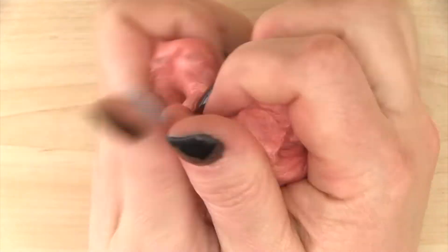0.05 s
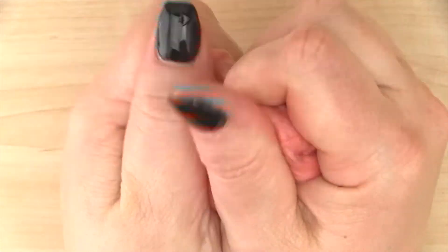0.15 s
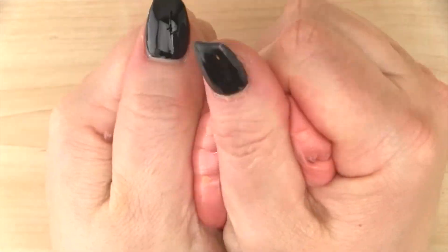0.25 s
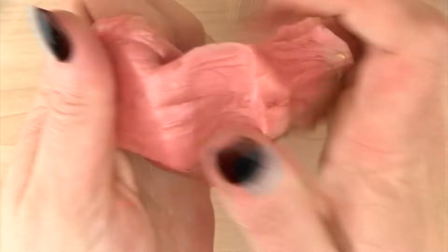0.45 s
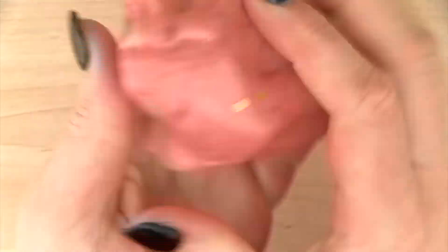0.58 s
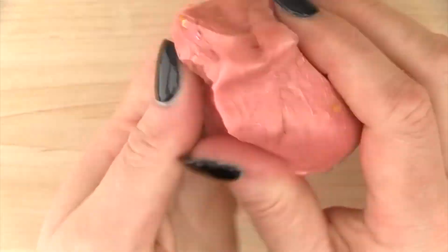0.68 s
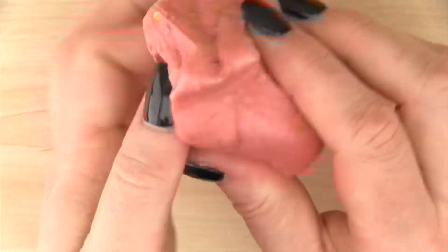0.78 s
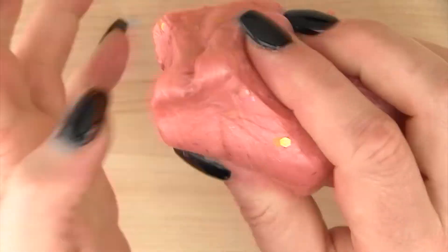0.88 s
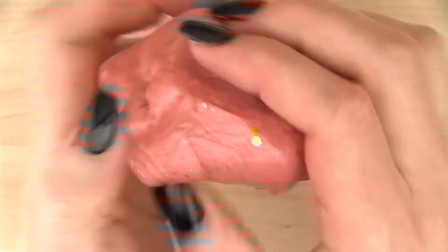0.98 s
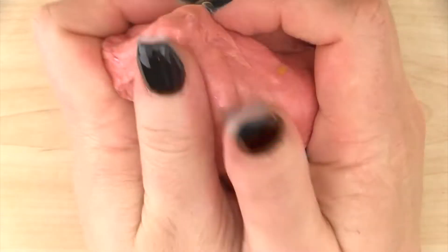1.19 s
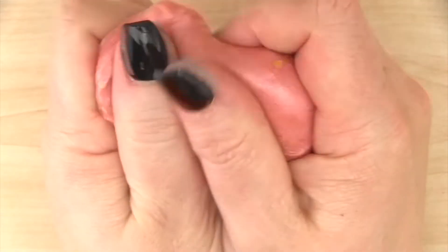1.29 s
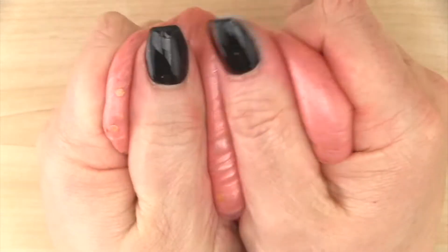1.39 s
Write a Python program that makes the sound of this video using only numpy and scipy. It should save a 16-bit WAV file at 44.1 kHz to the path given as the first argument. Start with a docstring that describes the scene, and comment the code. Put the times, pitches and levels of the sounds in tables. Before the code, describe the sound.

Close-up slime kneading in a small, still room; air pockets snap loudly in rapid succession early on, then only quiet scattered pops, sticky peeling and light ticks remain, over barely audible hiss and low hum.

```python
"""A table in a quiet room: slime is squeezed and folded between fingers, close to the microphone.
Trapped air pockets burst: a filtered impulse is the skin's snap, a decaying sine the cavity's ring.
Larger pockets also thud. Sticky folds peel apart in swells of random ticks, bubbles and squishes.
Hands, table and room answer by convolution; faint hiss and hum lie beneath."""
import sys
import numpy as np
from scipy import signal
from scipy.fft import rfft, irfft
from scipy.io import wavfile

SR = 44100
rng = np.random.default_rng(int(sys.argv[2]) if len(sys.argv) > 2 else 0)


def bounce(signal):
    """Save signal as a 16-bit WAV file at the path given by the first command-line argument."""
    frames = np.transpose(np.atleast_2d(signal))
    limited = np.clip(frames, -1, 1)
    pcm = np.round(limited * 32767).astype(np.int16)
    wavfile.write(sys.argv[1], SR, pcm)


N = 63945
EDGE_HZ = 16100  # upper band limit


def amp(db):
    """Decibels to gain."""
    return 10 ** (np.asarray(db) / 20)


def evened(x):
    """Scales to rms 1."""
    return x / np.sqrt(np.mean(x ** 2) + 1e-20)


def read(points, hz):
    """Interpolates a table along a log-frequency axis."""
    f_hz, value = np.transpose(points)
    return np.interp(np.log(hz + 1), np.log(f_hz), value)


def add(mix, start_s, sound):
    """Mixes a sound in at a time, cut at the end of the mix."""
    part = mix[max(round(start_s * SR), 0):][:len(sound)]
    part += sound[:len(part)]


def slope(x, hz, kind):
    """First-order low- or high-pass."""
    return signal.lfilter(*signal.butter(1, hz, kind, fs=SR), x)


def coloured(x, points, size=4096):
    """Minimum-phase filter with the given spectrum."""
    hz = abs(np.fft.fftfreq(size, 1 / SR))
    log_gain = np.log(amp(read(points, hz)))
    min_phase = np.exp(np.conj(signal.hilbert(log_gain)))
    taps = np.fft.ifft(min_phase).real[:size // 2]
    return signal.fftconvolve(x, taps)[:len(x)]


def pops():
    """Each skin breaks with a snap; the cavity under it rings briefly, its pitch rising."""
    # Bursting air pockets: t/s, ring level/dB, cavity f/Hz, ring decay/ms, snap level/dB, snap low-pass f/Hz
    pop_table = [ (0.0368, -53, 3600, .4, -26, 9100), (0.0425, -47.5, 1615, 5.8, -34, 10000),
                 (0.0691, -45.5, 4800, 0.16, -30.5, 14100), (.0055, -52, 10600, 1.7, -42.5, 9200),
                 (.1155, -68, 3500, 0.23, -41.5, 12000), (.1310, -46.5, 605, 1.1, -31.5, 3990),
                 (.1474, -40, 5500, 0.14, -25, 7500), (0.1948, -49, 9900, 0.65, -40, 8970),
                 (0.1992, -49.5, 4454, 0.095, -27.5, 10050), (0.2186, 1.5, 2490, 0.37, -27, 12000),
                 (0.2188, -12, 6000, 0.5, -37, 9000), (.2196, 2, 3627, 0.56, -12, 8000),
                 (0.2506, -13, 3340, 1, -1, 8500), (0.2526, -20, 2560, 1.8, 2.5, 5000),
                 (0.2633, -43, 4000, 0.092, -6.5, 10000), (.2700, -26.5, 2974, 0.75, -0.5, 14000),
                 (0.3041, -23, 2650, 0.86, -10, 5000), (0.315, -18, 3620, .3, -15, 13900),
                 (.3230, 0.5, 12260, .1, -7, 14400), (0.3329, -11, 9150, 0.25, -20, 7000),
                 (.3390, -25.5, 3190, 0.77, -19, 7000), (.3441, -32.5, 12100, 0.2, -22.5, 12000),
                 (0.3579, -39, 7000, .15, -26.5, 12000), (0.471, -44, 6700, 1.1, -40.5, 7000),
                 (0.498, -44.5, 430, 3.6, -35, 5000), (0.5094, -32.5, 3640, 1.6, -21, 4930),
                 (0.5903, -40.5, 4400, .5, -39.5, 8930), (.6670, -53, 1850, 1.4, -30.5, 10080),
                 (0.6772, -49, 3300, 1.0, -38.5, 8000), (0.7212, -40.5, 3440, 1.64, -40.5, 7960),
                 (0.72, -39, 4330, 1.6, -43, 7870), (0.8198, -58.5, 683, 2.8, -35.5, 6050),
                 (.8300, -44.5, 3463, 1.2, -43, 8070), (.8820, -46, 7600, .7, -42, 7000),
                 (.8927, -36.5, 3510, 1.13, -34, 9000), (.8985, -42, 717, 12.8, -53, 8930),
                 (.9000, -30.5, 3400, 0.78, -17.5, 3970), (0.9054, -35, 3300, 1.3, -39, 5025),
                 (1.1030, -63, 1561, 2.57, -44, 4920), (1.1160, -52, 1668, 3.67, -42, 4986),
                 (1.186, -56, 3735, 1.15, -47.5, 7960), (1.2502, -30.5, 1530, 0.25, -25, 6500),
                 (1.269, -55, 3930, .8, -48, 6060), (1.2829, -54.5, 4680, 0.47, -44, 8940),
                 (1.327, -58, 893, 1.2, -32.5, 4980), (1.3838, -24, 9000, 0.051, -13.5, 14030),
                 (1.4010, -33.5, 3440, .9, -26.5, 13000), (1.4070, -45, 2960, .8, -26.5, 6980),
                 (1.4331, -42, 1000, 1.9, -22, 4000), (1.438, -60, 3400, 0.18, -34, 11000)]
    attack_share = 0.12  # of the ring's decay
    rise_share = 0.03  # total pitch rise, centred on the cavity pitch
    # Small sources radiate little bass.
    ring_low_share, snap_low_hz = 0.62, 650
    out = np.zeros(N)
    ms = np.arange(SR // 10) / SR * 1000
    for start_s, ring_db, hz, decay_ms, snap_db, bright_hz in pop_table:
        left = np.exp(-ms / decay_ms)
        opening = 1 - np.exp(-ms / (attack_share * decay_ms))
        turns = np.cumsum(hz * (1 + rise_share * (.5 - left))) / SR
        radiation = signal.butter(2, ring_low_share * hz, "high", fs=SR)
        ring = signal.lfilter(*radiation, opening * left * np.sin(2 * np.pi * turns))
        brightness = signal.butter(2, min(bright_hz, EDGE_HZ), fs=SR)
        snap = signal.lfilter(*brightness, signal.unit_impulse(len(ms)))
        snap = slope(snap, snap_low_hz, "high")
        add(out, start_s, amp(ring_db) * ring + amp(snap_db) * snap)
    return out


def thuds():
    """The mass closes on a larger pocket: a low sine that swells and dies away softly."""
    # Thuds: t/s, level/dB, f/Hz, decay/ms (also the time of the envelope's peak)
    thud_table = [(0.2191, -24, 370, 0.52), (.2505, -32.5, 480, 0.68), (.2634, -39, 420, .7),
                  (.2700, -31, 450, 0.77), (0.3047, -35.5, 460, 0.47), (0.5109, -49, 430, 1.0)]
    out, t = np.zeros(N), np.arange(SR // 10) / SR
    for start_s, db, hz, decay_ms in thud_table:
        age = t * 1000 / decay_ms
        swell = age * np.exp(1 - age)
        add(out, start_s, amp(db) * swell * np.sin(2 * np.pi * hz * t))
    return out


def squelches():
    """Sticky folds part in a swell of crackles; the gap between them resonates as a squish."""
    # Peeling folds: t of peak/s, rise/s, fall/s, crackle level/dB, squish level/dB, squish f/Hz
    fold_table = [ (.006, 0.0062, .012, -64.5, -67, 1100), (.044, 0.01, 0.0067, -50.5, -59.5, 1370),
                  (0.094, 0.033, 0.12, -68, -73, 700), (0.2543, 0.0026, 0.0097, -34.5, -35.5, 1120),
                  (0.2705, 0.0014, 0.0027, -23, -30, 1200), (.307, 0.0014, 0.011, -38, -47.5, 1020),
                  (.466, 0.0061, .014, -70.5, -58, 4700), (0.505, 0.0089, 0.012, -43.5, -53, 450),
                  (0.507, 0.014, .012, -68, -65, 150), (.528, .01, 0.009, -58.5, -56.5, 1650),
                  (.552, 0.0081, 0.011, -53.5, -61.5, 500), (0.588, 0.0025, 0.0077, -54.5, -58, 4670),
                  (0.613, 0.012, 0.023, -62, -64.5, 3260), (0.676, 0.006, 0.02, -60, -70.5, 3000),
                  (.723, .006, .008, -70, -60.5, 4200), (.822, .008, 0.015, -72, -64.5, 676),
                  (0.847, 0.03, .012, -71, -60.5, 2960), (0.899, 0.004, 0.0073, -46.5, -44.5, 1005),
                  (0.89, 0.01, 0.0054, -64, -54.5, 3000), (0.955, 0.0095, .012, -68.5, -81, 1592),
                  (1.083, 0.0087, .03, -72, -76, 1700), (1.134, .003, 0.0032, -74, -72.5, 4800),
                  (1.205, 0.025, 0.01, -70, -83, 3680), (1.253, 0.00091, 0.0052, -70, -50, 1900),
                  (1.297, .008, .010, -67, -67, 4900), (1.366, 0.012, 0.0059, -72, -71, 4000),
                  (1.414, .006, 0.0095, -61.5, -62, 7800), (1.434, .002, 0.0046, -72, -53.5, 1550)]
    squish_q = 2.7
    t, crackles = np.arange(N) / SR, crackle()
    out, power = np.zeros(N), np.zeros(N)
    for peak_s, rise_s, fall_s, crackle_db, squish_db, hz in fold_table:
        swell = np.exp(-np.maximum((peak_s - t) / rise_s, (t - peak_s) / fall_s))
        squish = signal.lfilter(*signal.iirpeak(hz, squish_q, fs=SR), grains())
        squish = slope(squish, hz * 2, "low")
        squish = slope(squish, hz / 2, "high")
        out += amp(squish_db) * swell * evened(squish)
        power += (amp(crackle_db) * swell) ** 2
    return out + np.sqrt(power) * crackles


def crackle(count=24):
    """Dry ticks mixed with tiny resonant bubbles, each at one of a set of pitches."""
    # Crackle colour: f/Hz, relative level/dB
    crackle_colour = [(60, -22.5), (150, -11.5), (300, -9), (600, -7), (1500, -2), (2600, -1), (3500, 4.5),
                      (4600, -3), (7000, -6), (11000, -11.5), (16000, -15.5)]
    low_hz, high_hz, bubble_q = 1200, 13000, 11
    bubble_db = 0  # against the dry ticks
    train, which = grains(), rng.integers(0, count, N)
    bubbles = np.zeros(N)
    for k, hz in enumerate(np.geomspace(low_hz, high_hz, count)):
        bubbles += signal.lfilter(*signal.iirpeak(hz, bubble_q, fs=SR), train * (which == k))
    mixed = evened(grains()) + amp(bubble_db) * evened(bubbles)
    return evened(coloured(mixed, crackle_colour))


def grains():
    """A dense random train of tiny ruptures of uneven size and either sign."""
    mean_rate_hz, spread_db = 2600, 4.5
    size = amp(spread_db * np.minimum(rng.exponential(1, N), 3))
    sign = rng.choice([-1, 1], N)
    return size * sign * (rng.random(N) < mean_rate_hz / SR)


def surroundings(x):
    """Quick echoes off hands and table, a few ringing resonances, and the short tail of a small room."""
    # Echoes between hands and table: delay/s, strength (gain)
    echoes = [(.00058, 0.17), (.0016, .08)]
    # Room answer: f/Hz, level/dB
    room_colour = [(100, -4), (400, -1), (1000, -1), (2400, -2.4), (3500, 4.4), (5000, -0.3), (9000, -3),
                   (16000, -1.6)]
    # Room decay: f/Hz, t60/s
    room_t60 = [(100, 0.21), (1000, .33), (3500, 0.21), (8000, 0.2), (16000, 0.16)]
    # Resonances: f/Hz, t60/s, level/dB
    resonances = [(2379, 0.045, -31.5), (3030, 0.06, -30.5), (3400, .04, -28), (3675, 0.036, -25.5)]
    scatter_db, scatter_t60_s = -9, .024
    room_db, room_delay_s = -14.5, 0.0021
    t = np.arange(SR // 2) / SR
    near, far = rng.choice([-1., 1.], (2, len(t)))
    scatter = near * amp(-60 * t / scatter_t60_s) * (t > echoes[0][0])
    # The tail is noise that decays at its own rate in each band.
    hz, when_s, bands = signal.stft(far, SR, nperseg=256)
    decay_db = -60 * when_s / read(room_t60, hz)[:, None]
    bands = bands * amp(read(room_colour, hz)[:, None] + decay_db)
    tail = signal.istft(bands, SR)[1][:len(t)] * (t > room_delay_s)
    # Unit energy before each level
    answer = amp(scatter_db) * scatter / np.linalg.norm(scatter)
    answer += amp(room_db) * tail / np.linalg.norm(tail)
    for ring_hz, t60_s, db in resonances:
        ring = amp(-60 * t / t60_s) * np.sin(2 * np.pi * (ring_hz * t + rng.random()))
        answer += amp(db) * ring / np.linalg.norm(ring)
    for delay_s, strength in echoes:
        add(answer, delay_s, np.array([strength]))
    return x + signal.fftconvolve(x, answer)[:N]


def still_room():
    """Faint hiss, noise shaped in the spectrum, and a low steady sine hum."""
    # Hiss colour: f/Hz, relative level/dB
    hiss_colour = [(20, -4.5), (45, -7.5), (62, -1.5), (85, -7), (150, -3.5), (300, -11.5), (700, -13.5),
                   (1500, -19.5), (3500, -22), (6000, -24), (12000, -25), (16000, -26)]
    hiss_rms_db, hum_hz, hum_peak_db = -71, 60, -82.5
    hum = np.sin(2 * np.pi * (hum_hz * np.arange(N) / SR + rng.random()))
    gain = amp(read(hiss_colour, np.fft.rfftfreq(N, 1 / SR)))
    hiss = irfft(rfft(rng.standard_normal(N)) * gain, N)
    return amp(hiss_rms_db) * evened(hiss) + amp(hum_peak_db) * hum


def scene():
    """The slime in its room; pops and thuds share a bass cut."""
    bass_cut = signal.butter(2, 240, "high", fs=SR)
    bursts = signal.lfilter(*bass_cut, pops() + thuds())
    slime = bursts + squelches()
    return (surroundings(slime) + still_room())[None]


def record(dry):
    """The microphone thins the bass a little; a linear-phase low-pass then limits the band."""
    edge = signal.firwin(255, EDGE_HZ, window=("kaiser", 8), fs=SR)
    thinned = slope(dry, hz=30, kind="high")
    return signal.oaconvolve(thinned, edge[None], "same")


dry = scene()
out = record(dry)
bounce(out)
```